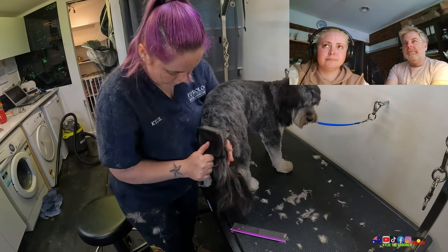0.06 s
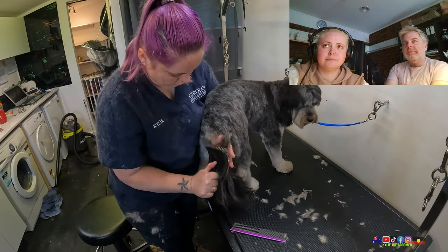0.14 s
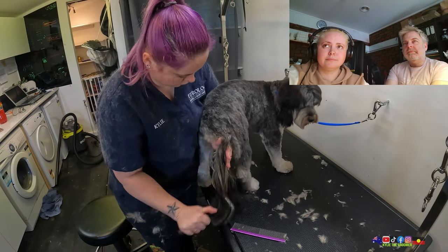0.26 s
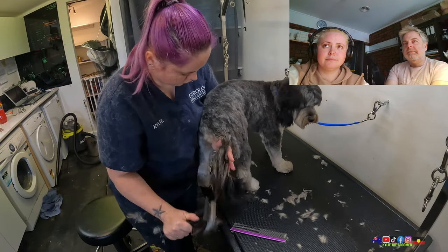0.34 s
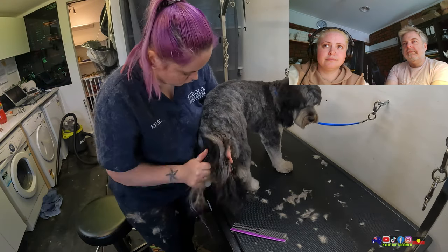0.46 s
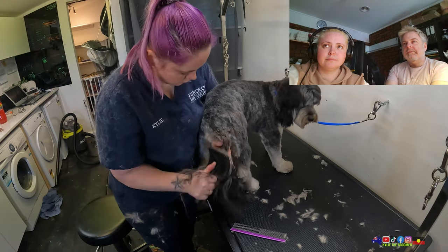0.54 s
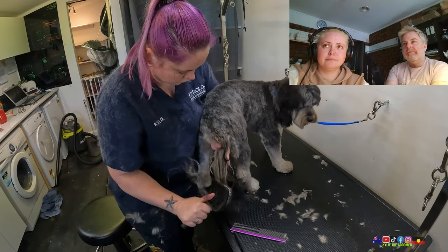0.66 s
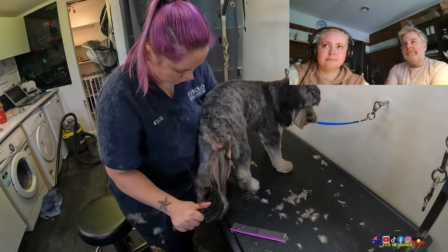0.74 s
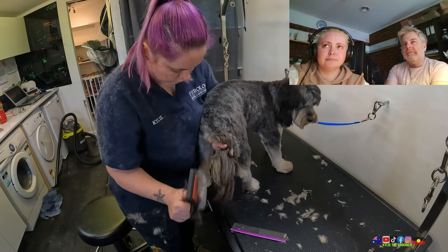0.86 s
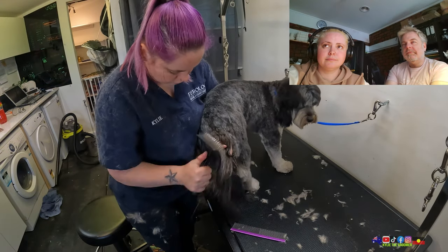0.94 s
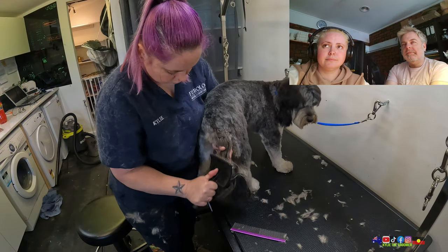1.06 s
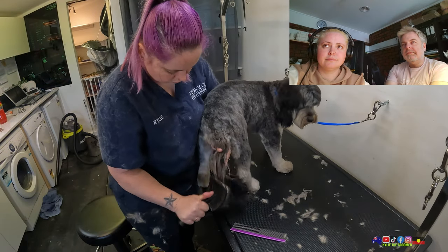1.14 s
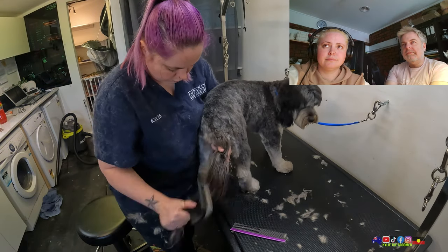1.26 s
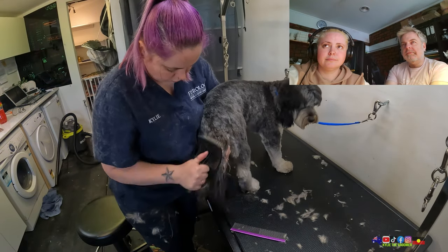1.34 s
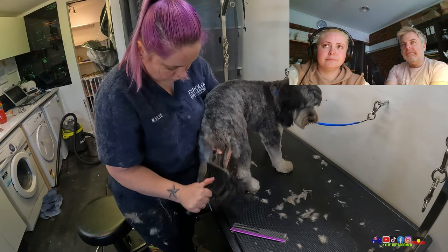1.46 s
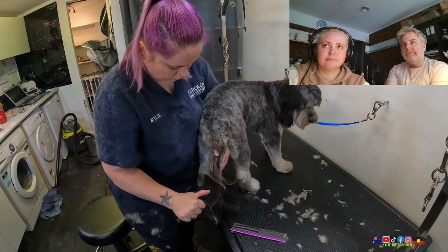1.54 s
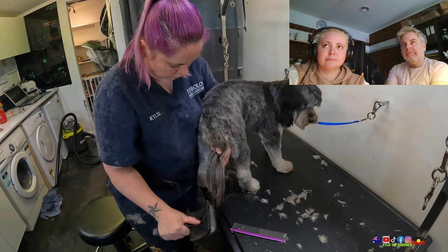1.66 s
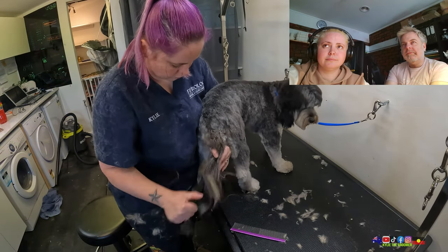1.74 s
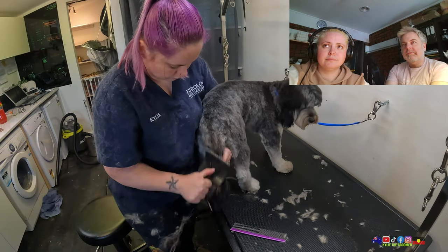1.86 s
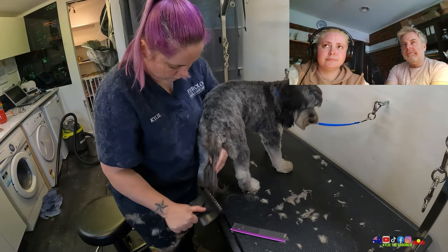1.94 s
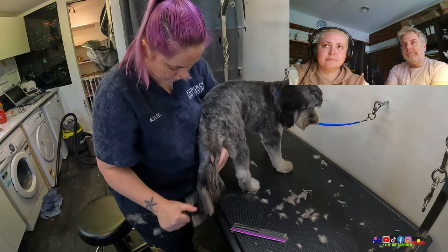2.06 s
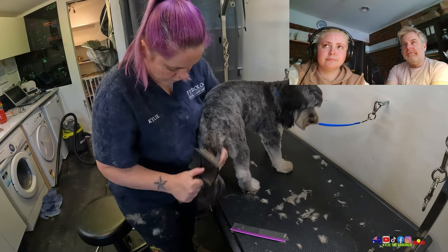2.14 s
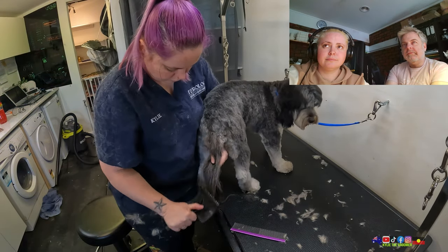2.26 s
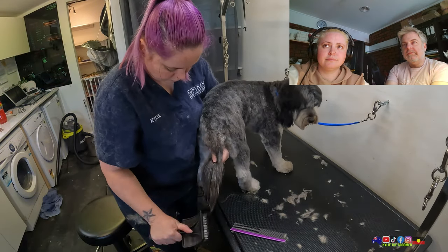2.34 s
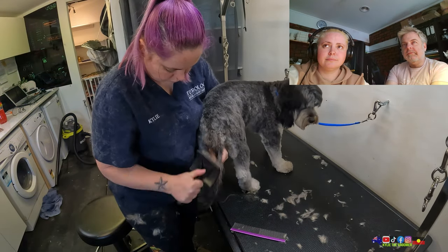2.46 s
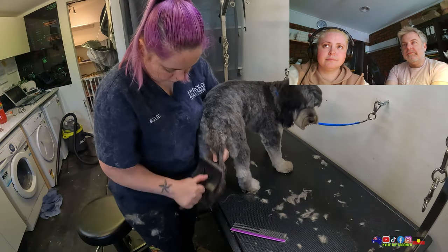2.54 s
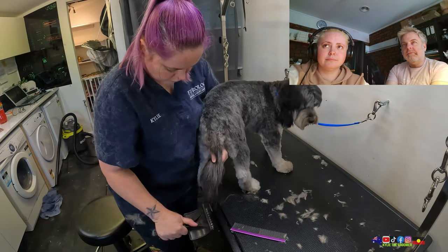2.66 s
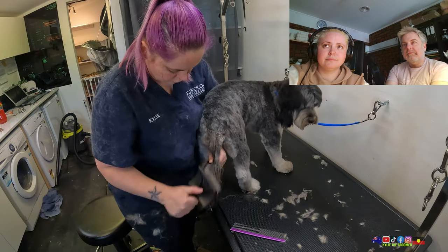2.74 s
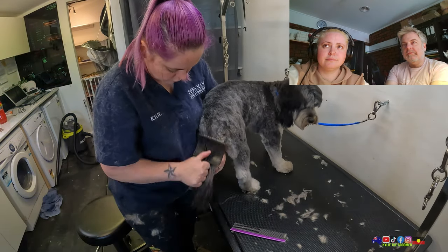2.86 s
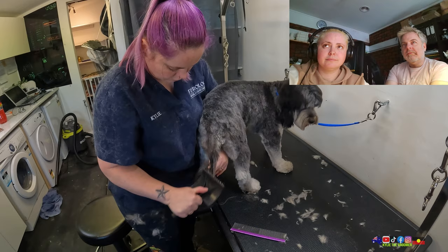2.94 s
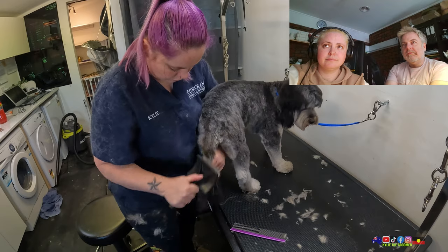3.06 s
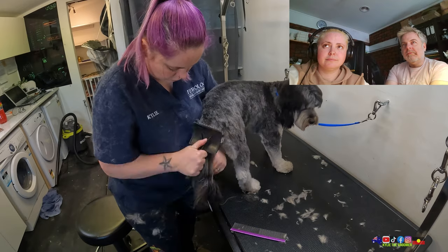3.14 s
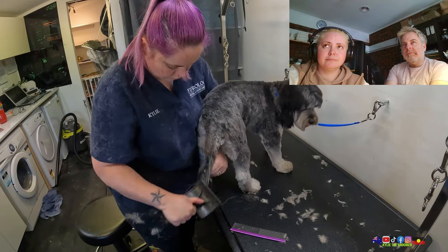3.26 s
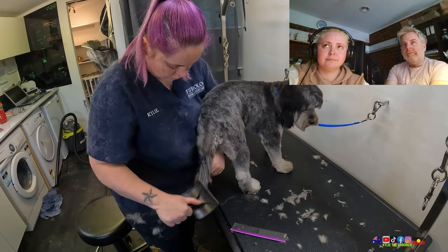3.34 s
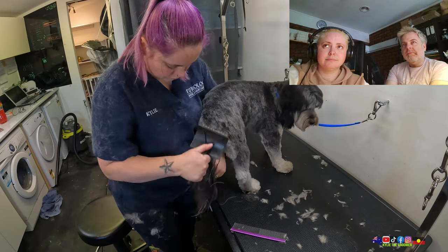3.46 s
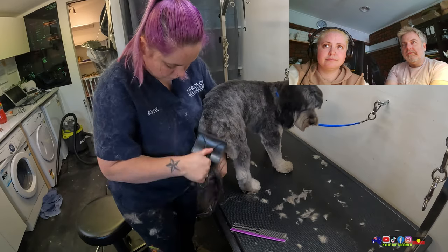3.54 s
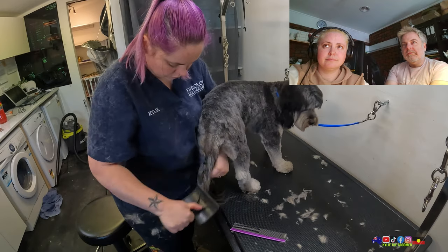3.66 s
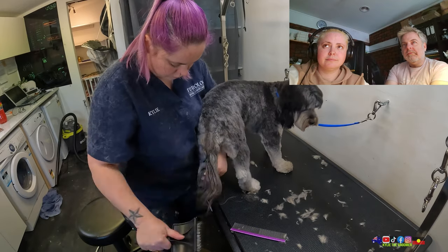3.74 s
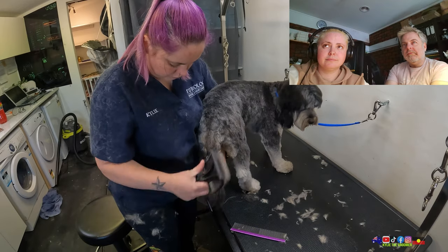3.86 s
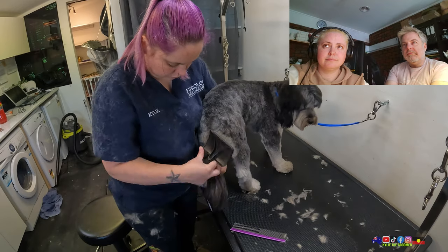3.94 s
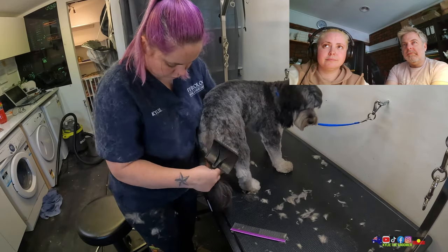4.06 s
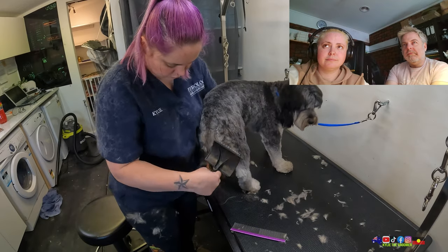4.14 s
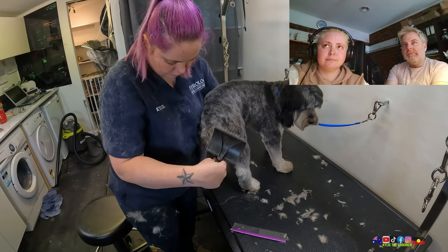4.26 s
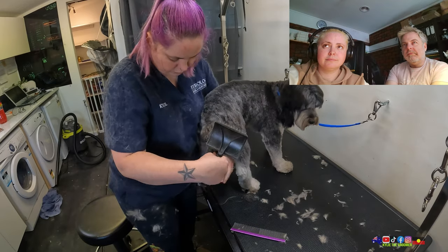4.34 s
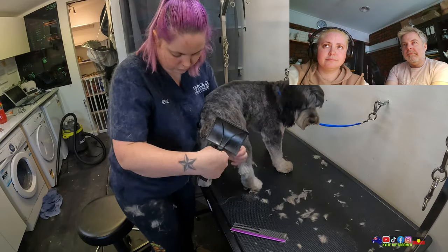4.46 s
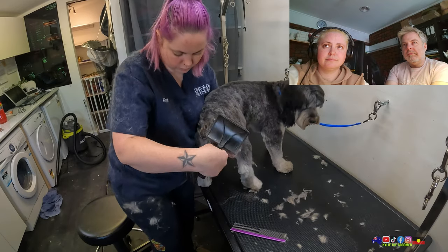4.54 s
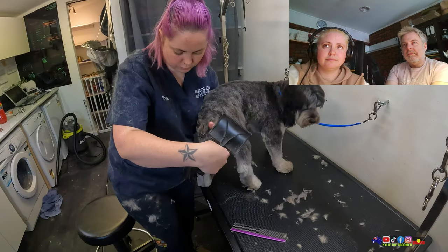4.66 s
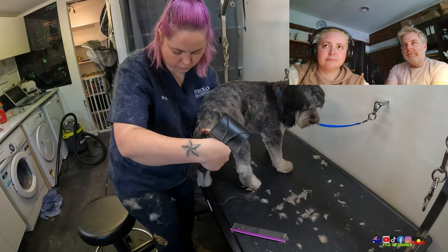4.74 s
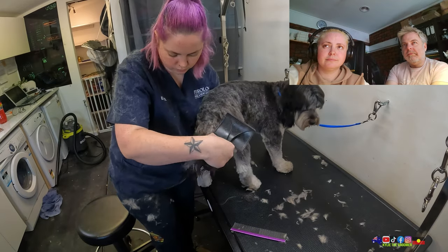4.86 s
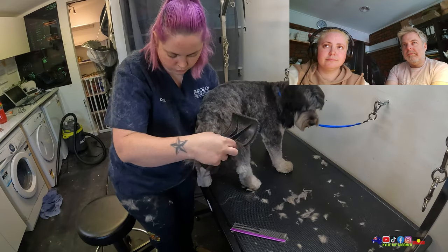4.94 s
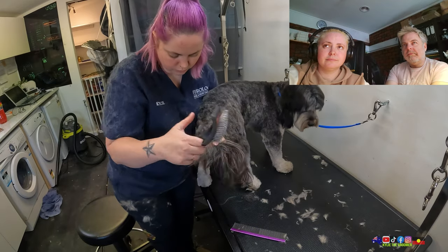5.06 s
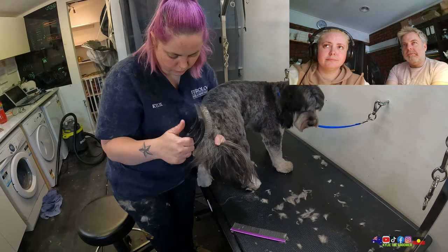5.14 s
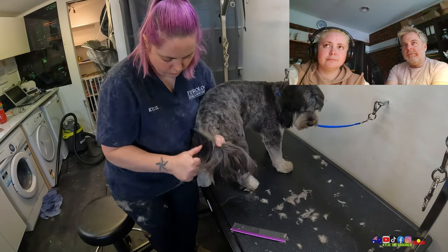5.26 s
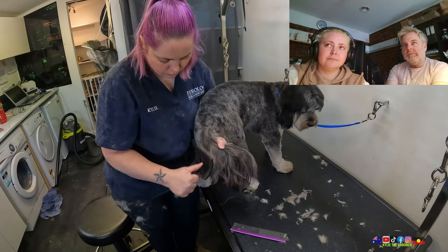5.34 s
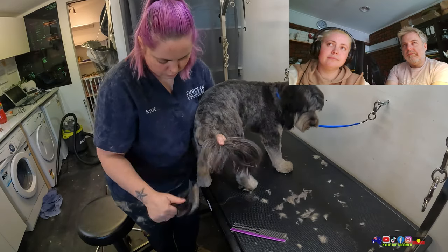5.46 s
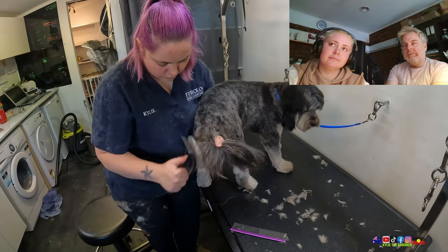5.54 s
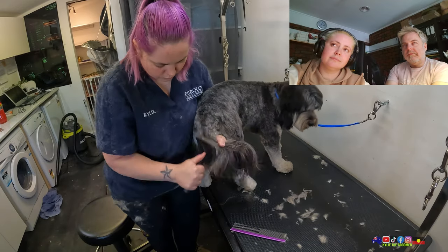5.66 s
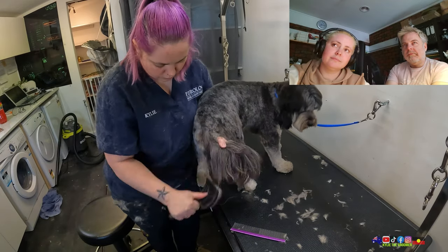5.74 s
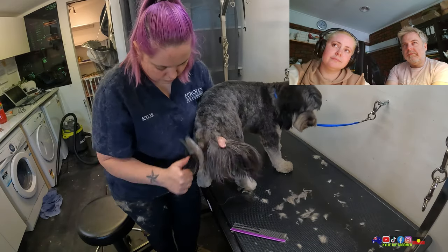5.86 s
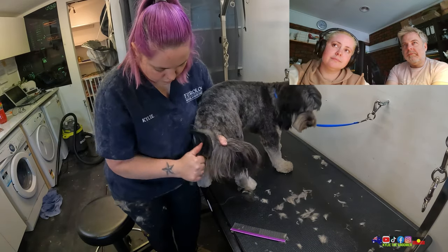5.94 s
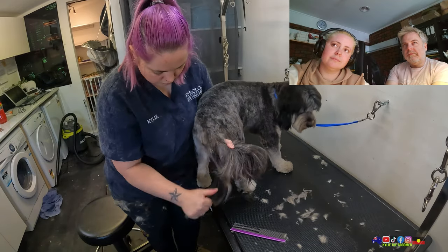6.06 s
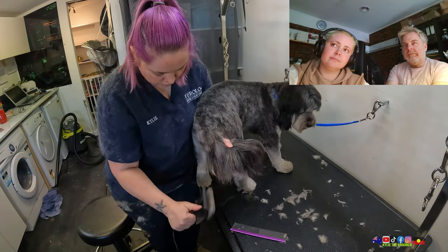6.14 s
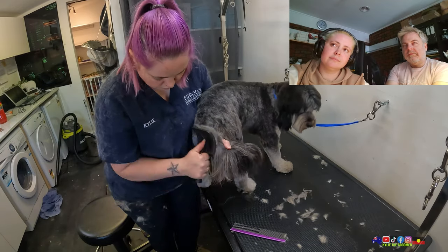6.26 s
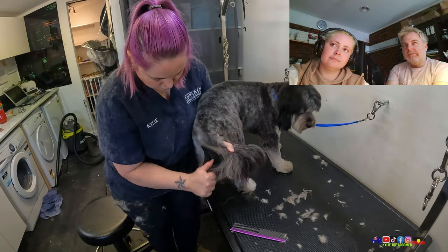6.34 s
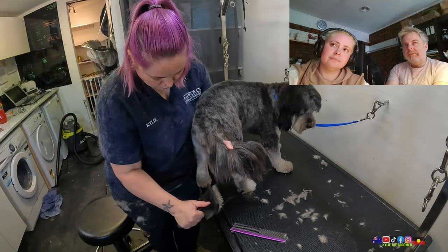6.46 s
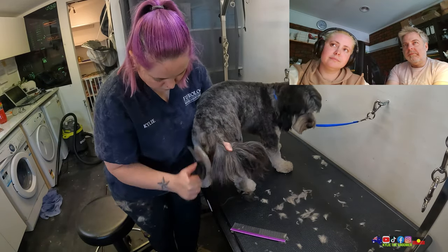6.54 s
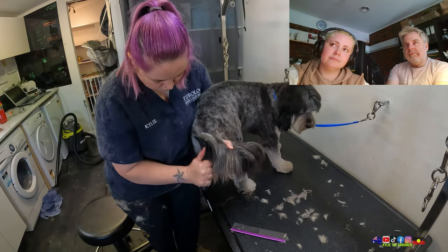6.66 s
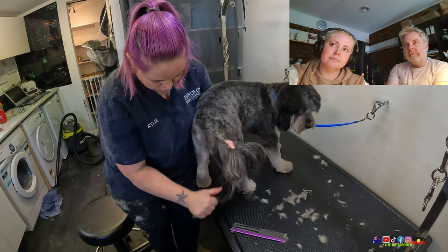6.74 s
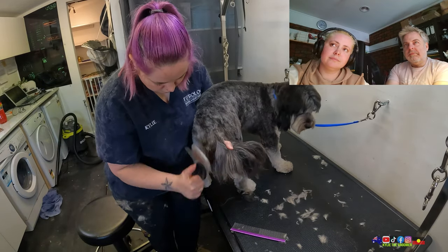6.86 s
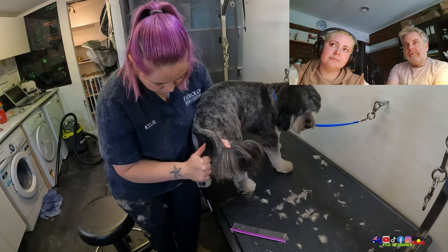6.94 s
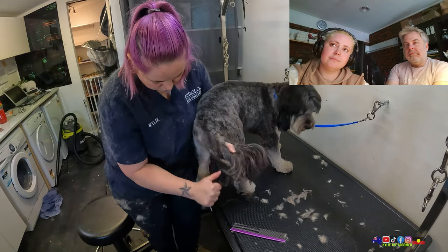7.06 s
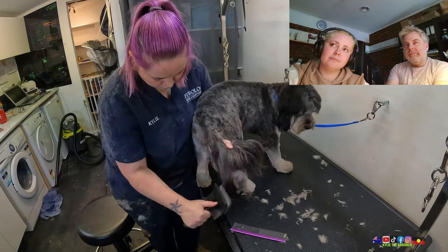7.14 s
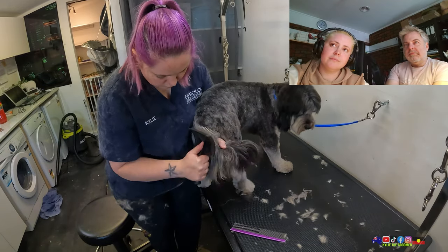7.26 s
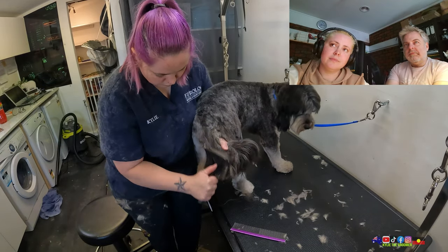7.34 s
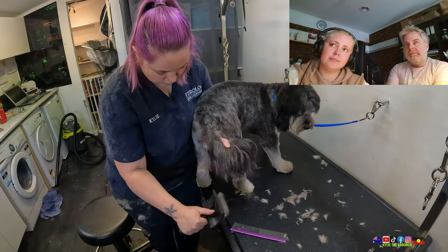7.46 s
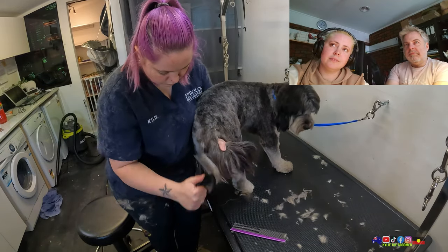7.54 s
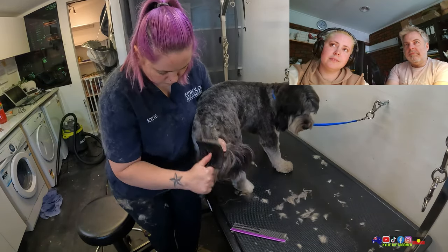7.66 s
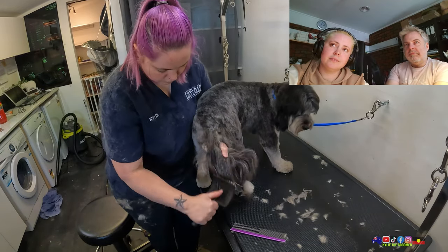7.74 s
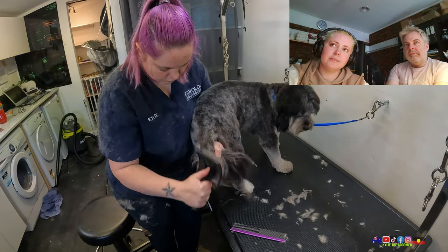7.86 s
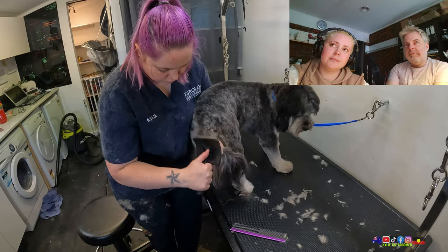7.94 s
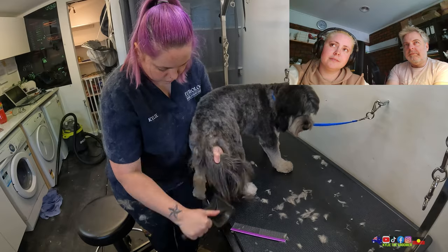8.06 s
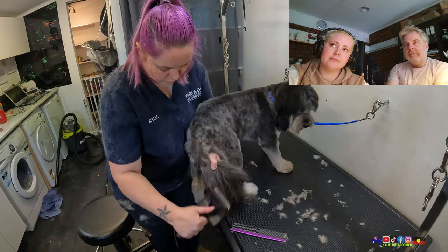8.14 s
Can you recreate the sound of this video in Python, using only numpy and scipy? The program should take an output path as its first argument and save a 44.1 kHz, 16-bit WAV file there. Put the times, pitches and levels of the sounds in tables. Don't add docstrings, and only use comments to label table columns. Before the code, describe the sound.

A slicker brush pulls through matted dog hair: slightly longer dry rips at first, then quick regular scrapes with bright wiry fizz and snapping knots. After a gap of over a second with only finger taps and coat rustle, brushing picks up again to the end. Faint metal clinks, one tiny squeak and a soft low rumble sit underneath. Close stereo microphone, short lively room reverberation, dull far-off thuds last.

```python
import sys
import numpy as np
from scipy import signal
from scipy.fft import rfft, irfft, next_fast_len
from scipy.io import wavfile
from scipy.ndimage import map_coordinates

SR = 44100
rng = np.random.default_rng(int(sys.argv[2]) if len(sys.argv) > 2 else 0)


def ratio(d):
    e = np.asarray(d, float) / 20
    return 10 ** e


def master_out(mix):
    frames = np.transpose(np.atleast_2d(mix))
    ceiling = np.clip(frames, -1, 1)
    pcm = np.round(ceiling * 32767).astype(np.int16)
    wavfile.write(sys.argv[1], SR, pcm)


N = 361619


def rms_one(x):
    return x / np.sqrt(np.mean(x ** 2) + 1e-20)


def at_hz(points, hz):
    table_hz, value = np.array(points).T
    return np.interp(np.log(hz + 1), np.log(table_hz + 1), value)


def drift(rate):
    r = np.exp(-2 * np.pi * rate / SR)
    noise = rng.standard_normal(N + SR)
    return rms_one(signal.lfilter([1], [1, -2 * r, r * r], noise)[SR:])


def resonate(x, hz, width):
    r = np.exp(-np.pi * width / SR)
    zeros = np.array([1, 0, -1]) * (1 - r * r) / 2
    poles = [1, -2 * r * np.cos(2 * np.pi * hz / SR), r * r]
    return signal.lfilter(zeros, poles, x + 1e-18)


def body(x, modes):
    return sum((-1) ** k * ratio(db) * resonate(x, hz, width) for k, (hz, width, db) in enumerate(modes))


def ring(s, db, hz, t60):
    t = np.maximum(np.arange(N) / SR - s, 0)
    return ratio(db - 60 * np.minimum(t / t60, 4)) * np.sin(2 * np.pi * hz * t)


def snags(per_s, spread_db, clump_db):
    sizes = ratio(spread_db * np.minimum(rng.exponential(1, N), 4)) * rng.choice([-1, 1], N)
    slipping = rng.random(N) < per_s / SR
    return rms_one(sizes * slipping * ratio(clump_db * drift(73)))


def bursts(events, decay_s, sharp, rise_s=.0001):
    start = np.zeros(N)
    start[[round(e[0] * SR) for e in events]] = ratio([e[1] for e in events])
    fall, rise = np.exp(-1 / (decay_s * SR)), np.exp(-1 / (rise_s * SR))
    decaying = signal.lfilter([1], [1, -fall], start + 1e-18)
    shape = signal.lfilter([1 - rise], [1, -rise], decaying)
    return sharp * start + shape * rng.standard_normal(N)


# t/s, tick peak level/dB, pad centre as the pull ends f/Hz, digging-in time/s,
# sizzle of the tips level/dB
LANDINGS = [(0.1592, -28.5, 1810, 0.019, -12), (0.5771, -23, 1850, 0.017, -13),
            (1.0902, -26, 1820, 0.076, -11), (1.4816, -28.5, 1700, 0.062, -10),
            (1.92, -43, 1830, 0.017, -11.5), (2.2736, -48, 1830, 0.028, -9.5),
            (2.596, -37, 1820, 0.023, -8.5), (2.9444, -31.5, 2020, 0.029, -15),
            (3.25, -36, 1860, .012, -13.5), (3.6214, -32, 1700, 0.032, -12), (5.3332, -32, 1860, 0.068, -7),
            (5.716, -33, 2070, .018, -10), (6.0402, -29.5, 1760, 0.017, -9.5), (6.37, -33, 1890, 0.03, -13),
            (6.7135, -37, 2030, 0.0076, -12), (7.0378, -30.5, 1700, 0.026, -10),
            (7.396, -30, 1770, 0.01, -9), (7.7185, -28.5, 1800, 0.014, -10.5),
            (8.0316, -26.5, 2540, 0.073, -14)]
# level at the bite/dB, level at letting go/dB, landing-to-bite time/s,
# pull time/s, wires minus pad level/dB
PULLS = [(-34.5, -38, 0.036, 0.19, -5.5), (-31.5, -39, .047, 0.19, -5.5),
         (-35.5, -32.5, 0.056, 0.091, -4.5), (-30, -40.5, 0.068, 0.14, -5.5),
         (-31, -29.5, 0.038, 0.065, -3.5), (-32.5, -32, 0.039, 0.068, -4.5), (-38.5, -27, 0.04, 0.032, -4),
         (-36.5, -32, 0.031, 0.067, -3), (-36.5, -37, 0.034, 0.12, -3.5), (-40.5, -32, 0.019, .11, -3),
         (-36.5, -37.5, 0.059, 0.058, -9), (-31, -30.5, 0.032, .032, -8.5), (-33, -32.5, 0.031, 0.05, -7.5),
         (-37.5, -31, 0.04, 0.065, -7.5), (-37.5, -28.5, 0.029, 0.047, -6.5),
         (-32.5, -34, 0.05, 0.077, -8.5), (-34, -31, 0.03, 0.048, -6.5), (-35.5, -31, 0.032, 0.055, -7),
         (-29, -33.5, 0.057, 0.077, -5)]


def brush():
    pad_db, wire_db, tip_db, centre_hz = strokes()
    slips = snags(5000, 1, clump_db=.8)
    hairs = slips + 0.39 * snags(9000, 4.4, clump_db=5.0)
    raking = rms_one(pad(slips, centre_hz)) + ratio(wire_db) * wires(hairs, tip_db)
    return ratio(pad_db) * raking + landing()


def strokes():
    release_s, release_db, trail_s, trail_db = 0.063, -17.5, 0.096, -18
    settle_db, arch_db = -14.5, 1
    t = np.arange(N) / SR
    pad_db, wire_db, tip_db, centre_hz = np.full(N, -120.), np.zeros(N), np.zeros(N), np.full(N, 2000.)
    for (land, _, end_hz, dig, sizzle_db), (bite_db, go_db, wait, pull, wiry_db) in zip(LANDINGS, PULLS):
        steps = [0, max(wait - dig, 0), min(dig, wait), pull / 2, pull / 2, release_s, trail_s]
        s = land + np.cumsum(steps)
        inside = (t >= s[0]) & (t <= s[-1])
        now = t[inside]
        light_db, out_db = bite_db + settle_db, go_db + release_db
        middle_db = (bite_db + go_db) / 2 + arch_db
        levels = [light_db, light_db, bite_db, middle_db, go_db, out_db, out_db + trail_db]
        pad_db[inside] = np.interp(now, s, levels)
        wire_db[inside] = wiry_db + np.interp(now, s, [3, 3, 0, 0, 0, 0, -5.5])
        tip_db[inside] = sizzle_db
        centre_hz[inside] = np.interp(now, s[[2, 4, 5]], [2020, end_hz, 1900])
    return pad_db, wire_db, tip_db, centre_hz


# f/Hz, bandwidth/Hz, level/dB
PAD = [(329, 152, -7.5), (740, 94, -3.5), (970, 160, -4), (1200, 156, -0.5), (1385, 68, -3),
       (1523, 84, -4.5), (1700, 148, -5), (1830, 165, -4), (1988, 114, -3), (2160, 157, -5.5),
       (2383, 218, -4), (2570, 340, -5), (3060, 350, -12.5)]


def pad(slips, centre_hz):
    flicker, out = [drift(30), drift(18.0), drift(28)], 0
    for k, (hz, width, db) in enumerate(PAD):
        off_centre = np.minimum(np.log2(hz / centre_hz) ** 2, .4)
        gain = ratio(db - 25.2 * off_centre + 0.75 * flicker[k % 3])
        out = out + (-1) ** k * gain * resonate(slips, hz, width)
    return out


# f/Hz, bandwidth/Hz, level/dB
WIRES = [(3500, 1200, 1), (5200, 940, 5), (6100, 2650, -2), (8800, 1300, -17)]
# f/Hz, bandwidth/Hz, level/dB
TIPS = [(10860, 3000, -2.5), (12700, 2900, 8)]


def wires(hairs, tip_db):
    snaps = .6 * hairs + snags(1500, 4.8, clump_db=2)
    shafts = 0
    for k, (hz, width, db) in enumerate(WIRES):
        shafts = shafts + (-1) ** k * ratio(db + 0.89 * drift(43)) * resonate(hairs, hz, width)
    return rms_one(shafts) + ratio(tip_db) * rms_one(body(snaps, TIPS))


# f/Hz, bandwidth/Hz, level/dB
TICK = [(2000, 1160, -0.5), (5870, 860, 0), (8000, 620, -4.5), (12400, 2000, -8.5)]


def landing():
    tick = bursts(LANDINGS, decay_s=0.0014, sharp=4.5)
    spread = bursts(LANDINGS, decay_s=.009, sharp=0)
    return ratio(3.0) * body(tick + 0.36 * spread, TICK)


# t/s, peak level/dB, ring f/Hz
KNOTS = [(0.2997, -28, 5060), (0.377, -30.5, 3840), (0.3825, -39, 5270), (1.099, -36, 4940),
         (1.5917, -22, 3950), (2.3493, -23.5, 5270), (2.6332, -27, 5190), (3.071, -29, 4300),
         (3.3082, -34, 5580), (3.3202, -29, 5740), (3.3996, -26.5, 5360), (3.6491, -38, 3520),
         (3.7228, -18, 4100), (5.345, -31, 3610), (5.4312, -36, 6130), (8.166, -36, 3980)]


def knots():
    out = 0
    for s, db, hz in KNOTS:
        crack = bursts([(s, db)], decay_s=0.0034, sharp=2.2)
        out = out + ratio(4.5) * resonate(crack, hz, 0.39 * hz)
    return out


# start t/s, end t/s, level/dB, from f/Hz, to f/Hz
SQUEAK = (1.335, 1.395, -61, 3240, 3310)


def squeak():
    start, end, db, from_hz, to_hz = SQUEAK
    t = np.arange(N) / SR
    shape = np.interp(t, [start, start + .004, end, end + .05], [0, 1, .7, 0])
    hz = np.interp(t, [start, end], [from_hz, to_hz])
    return ratio(db) * shape * np.sin(2 * np.pi * np.cumsum(hz) / SR)


# t/s, peak level/dB, ring f/Hz, bandwidth/Hz, fade/s
TAPS = [(3.869, -43, 4630, 1500, 0.0058), (3.937, -51.5, 5200, 2000, 0.022), (3.96, -47, 1390, 800, 0.043),
        (4.049, -53, 4420, 4900, 0.012), (4.055, -43, 970, 400, 0.012), (4.152, -43, 2020, 600, 0.0036),
        (4.185, -45, 1600, 500, 0.018), (4.523, -42, 1720, 1850, 0.051), (4.538, -42.5, 3180, 2500, 0.002),
        (4.818, -41.5, 1410, 600, 0.009), (4.925, -40.5, 2800, 500, 0.0044), (4.998, -56, 4530, 1200, 0.03),
        (5.025, -43, 567, 500, 0.038), (5.028, -47.5, 3080, 2200, 0.019), (5.551, -52, 3500, 2930, 0.005),
        (5.637, -42, 1820, 1410, 0.021), (6.0, -57.5, 2200, 2500, 0.041)]


def taps():
    out = 0
    for s, db, hz, width, fade_s in TAPS:
        puff = bursts([(s, db)], fade_s, sharp=0.01 / fade_s, rise_s=0.14 * fade_s)
        out = out + resonate(resonate(puff, hz, 1.08 * width), hz, 1.08 * width)
    return ratio(10.5) * out


# t/s, peak level/dB, brightness/(dB per octave)
CLINKS = [
    (1.3972, -61, 0),
    (1.7749, -54.5, -3),
    (2.8644, -57, -4),
    (5.6376, -52.5, -0.5),
    (5.882, -53, -1.5),
]
# f/Hz, level/dB, t60/s
CLASP = [(1750, 1, .12), (2250, 3, .3), (3700, -5, .14), (4350, -1, .16), (5720, -1, .14), (5900, -5, .1),
         (6550, -4, .12), (7500, -6, .1), (11330, -2, .1), (14800, -3, .03)]


def clasp():
    luck, out = rng.normal(-1, 2, (len(CLINKS), 12)), 0
    for k, (hz, level_db, t60) in enumerate(CLASP):
        touches, width = np.zeros(N), np.log(1000) / np.pi / (0.66 * t60)
        touch_db = np.array(CLINKS) @ [0, 1, np.log2(hz / 4000)] + level_db + luck[:, k]
        touches[[round(c[0] * SR) for c in CLINKS]] = ratio(touch_db)
        out = out + resonate(touches, hz, width) * SR / (2 * np.pi * width)
    scrape = bursts(CLINKS, decay_s=.018, sharp=.5, rise_s=.001)
    return out + ratio(7) * resonate(scrape, 5000, 4000)


# t/s, rustle
# level/dB, dry hair minus cloth level/dB
RUSTLE = [(0.0, -46, -20), (0.09, -59.5, -4), (0.5, -61, -2), (1.0, -64, -3), (1.36, -60.5, -1),
          (1.8, -55.5, -6), (2.25, -67, -15), (2.88, -56, -5), (3.5, -66.5, 6), (3.86, -62, 9),
          (4.06, -54, -6), (4.2, -61.5, 0.5), (4.91, -61, 2.5), (5.04, -56.5, -1.5), (5.28, -49, 0),
          (6.0, -59.5, -7), (7.0, -60, -2), (8.0, -64, -2)]


def rustle():
    s, low_db, dry_db = np.transpose(RUSTLE)
    t = np.arange(N) / SR
    grains = snags(6000, 1.14, clump_db=2.0)
    low = rms_one(resonate(body(grains, [(696, 770, -7.5), (1600, 3100, -8.0)]), 960, 2600))
    fine = snags(9000, 2.6, clump_db=1.5)
    hiss = resonate(resonate(fine, 5400, 3600), 5400, 4400)
    air = resonate(resonate(fine, 11800, 3500), 11800, 3500)
    high = rms_one(hiss + ratio(-10) * air)
    cloth = ratio(np.interp(t, s, low_db) - 4.5) * low
    return cloth + ratio(np.interp(t, s, low_db + dry_db) - 11) * high


# f/Hz, left minus right level/dB
LEFT_LOUDER = [(60, -4), (180, -2), (550, 0.5), (1650, 1), (4970, 0), (15000, 5.5)]
# f/Hz, phase/rad
LEFT_LEADS = [(100, 0.56), (900, -0.54), (2400, -0.82), (5000, -0.68), (12000, -0.44)]
# f/Hz, t60/s
ROOM_T60 = [(300, 0.31), (2000, 0.23), (6000, 0.2), (13000, 0.13)]


def room(x):
    size = next_fast_len(N + SR // 2)
    hz, t = np.fft.rfftfreq(size, 1 / SR), np.arange(SR // 2) / SR
    half = ratio(at_hz(LEFT_LOUDER, hz) / 2) * np.exp(.5j * at_hz(LEFT_LEADS, hz))
    noise, tail = rng.standard_normal((2, 2, len(t))), 0
    for low in 100 * 2. ** np.arange(8):
        octave = signal.butter(2, [low, min(2 * low, .45 * SR)], "band", fs=SR, output="sos")
        decay = ratio(-60 * t / at_hz(ROOM_T60, 2.4 * low)) * (t > .002)
        lively = (low / 1600) ** 0.13
        tail = tail + signal.sosfilt(octave, noise) * decay * lively
    tail = ratio(-6.5) * tail / np.sqrt(np.sum(tail ** 2) / 4)
    place = 2.06 * drift(3.1)
    moving = rfft(x * np.array([np.cos(place), np.sin(place)]), size)[:, None]
    both = rfft(x, size) + np.sum(moving * rfft(tail, size), axis=0)
    left, right = irfft(both * np.array([half, 1 / half]), size)[:, :N]
    swing = 0.33 * drift(5.1)
    return np.array([left, map_coordinates(right, [np.arange(N) + swing], order=3, mode="nearest")])


# t/s, peak level/dB, ring f/Hz, t60/s
THUDS = [
    (8.11, -27.5, 105, 0.22),
    (8.152, -26, 77, 0.48),
]


def thuds():
    deep = signal.lfilter([.03], [1, -.97], sum(ring(*thud) for thud in THUDS))
    return deep + 0.74 * resonate(deep * np.abs(deep) * 30, 200, 60)


# f/Hz, level/(dB per Hz)
HUM = [(8.8, -52), (15, 3), (34, -2), (60, -6), (135, -28), (214, -11.5), (393, -17), (429, -20),
       (481, -17.5), (991, -31.5), (1440, -25.5), (3970, -58), (7080, -42.5), (12600, -58), (15000, -70)]
# f/Hz, bandwidth/Hz, boost/dB
HUM_MODES = [(118, 40, 12), (168.6, 28, 9.5), (215.5, 7.9, 7.5), (324.2, 32, 7)]
# f/Hz, correlation/1
HUM_LIKENESS = [(40, 1), (130, 0.76), (300, 0.89), (700, 0.51), (8000, 0.38)]
# t/s, level/dB
RUMBLE = [(0.0, -59), (0.31, -56), (0.74, -57.5), (1.28, -53.5), (1.5, -47), (1.77, -55.5), (2.6, -52.5),
          (3.29, -55), (3.47, -49), (3.76, -55.5), (4.01, -50), (4.37, -53.5), (5.0, -51), (5.6, -51),
          (5.9, -53), (6.37, -49.5), (7.6, -56), (8.05, -54)]


def hum():
    hz = np.fft.rfftfreq(N, 1 / SR)
    tones_db = sum(db / (1 + (2 * (hz - f) / width) ** 2) for f, width, db in HUM_MODES)
    alike = np.clip(at_hz(HUM_LIKENESS, hz), 0, 1)
    mid, side = rfft(rng.standard_normal((2, N))) * ratio(at_hz(HUM, hz) + tones_db)
    both = np.sqrt(1 + alike) * mid + np.sqrt(1 - alike) * side * [[1], [-1]]
    bass, rest = irfft(both * (hz < 95), N), irfft(both * (hz >= 95), N)
    s, swell_db = np.transpose(RUMBLE)
    swell = ratio(np.interp(np.arange(N) / SR, s, swell_db))
    return swell * rms_one(bass) + ratio(-53.5) * rms_one(rest)


def scene():
    near = brush() + knots() + squeak() + taps() + clasp() + rustle()
    return room(near) + thuds() + hum()


def roll_off(x):
    return signal.sosfilt(signal.butter(12, 16510, fs=SR, output="sos"), x)


def record(dry):
    mix = signal.sosfilt(signal.butter(10, 14200, fs=SR, output="sos"), dry)
    return roll_off(mix)


dry = scene()
out = record(dry)
master_out(out)
```